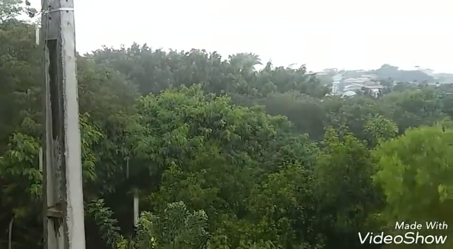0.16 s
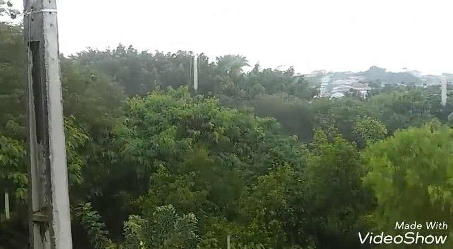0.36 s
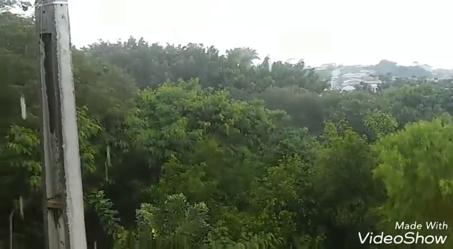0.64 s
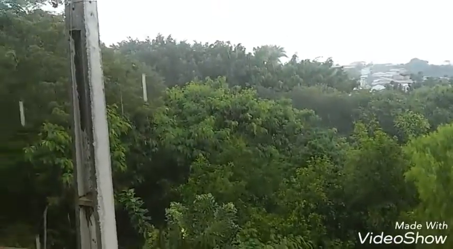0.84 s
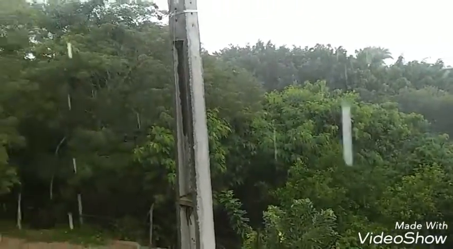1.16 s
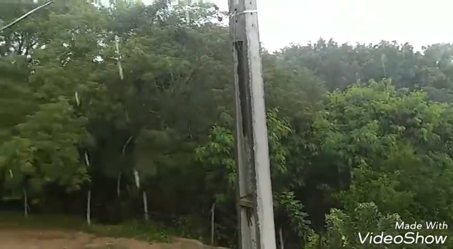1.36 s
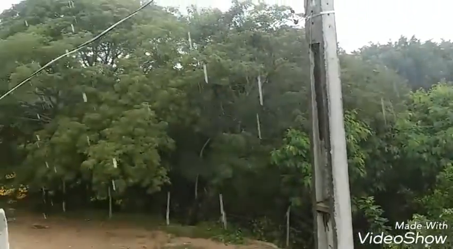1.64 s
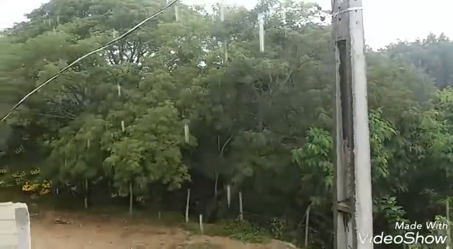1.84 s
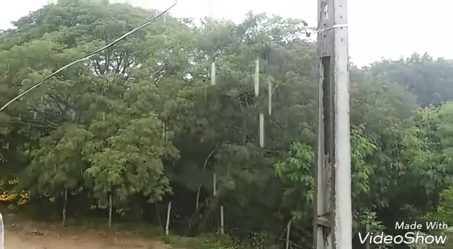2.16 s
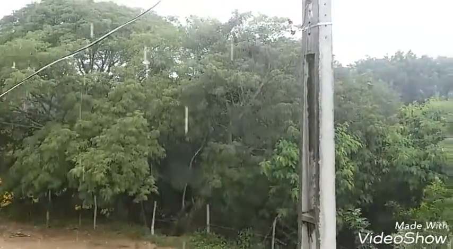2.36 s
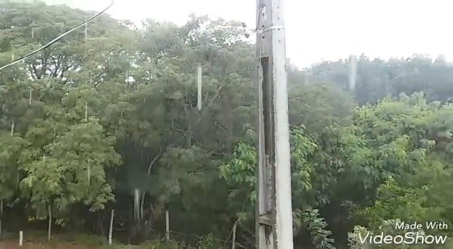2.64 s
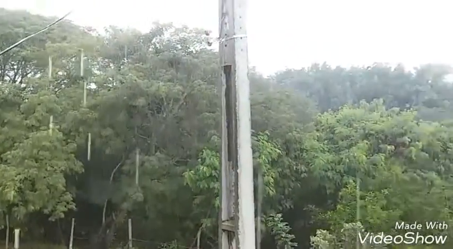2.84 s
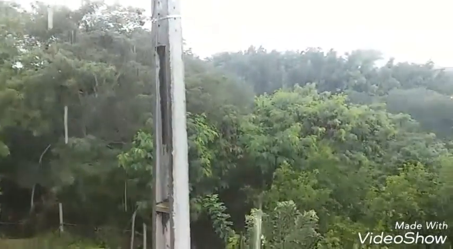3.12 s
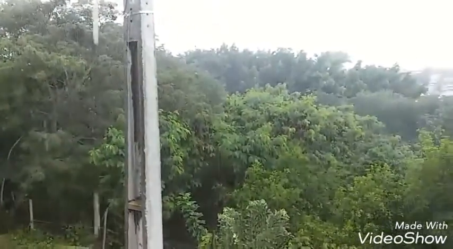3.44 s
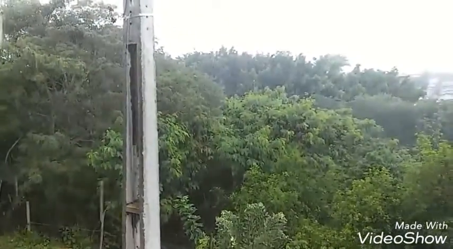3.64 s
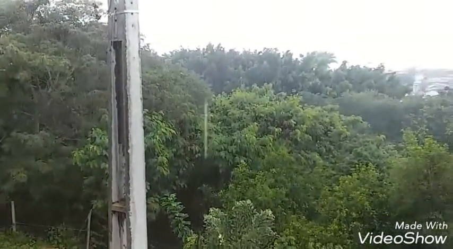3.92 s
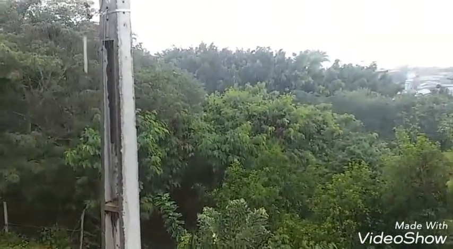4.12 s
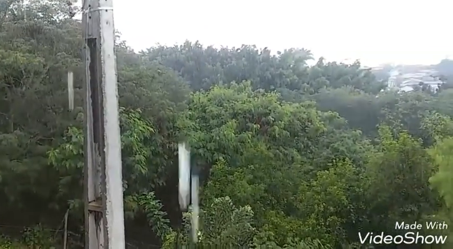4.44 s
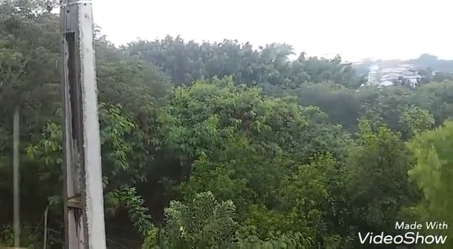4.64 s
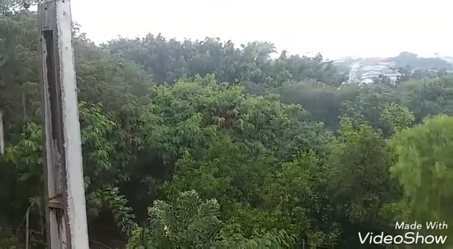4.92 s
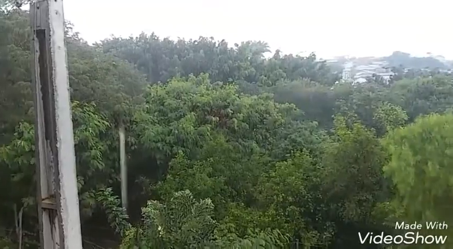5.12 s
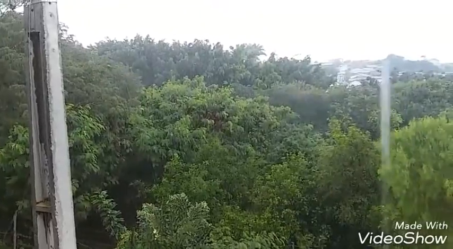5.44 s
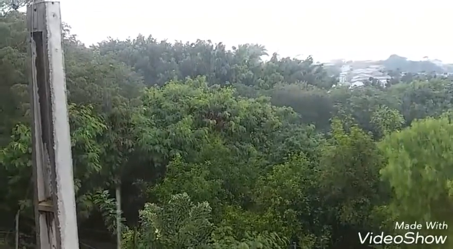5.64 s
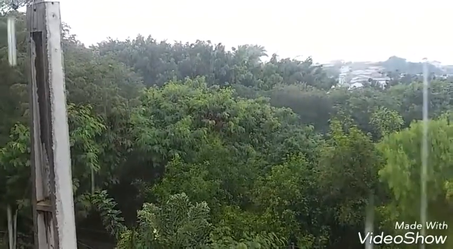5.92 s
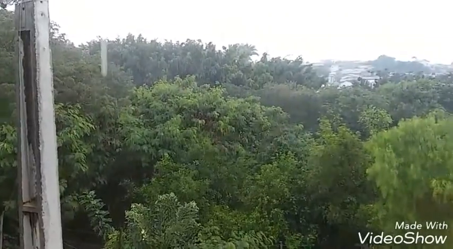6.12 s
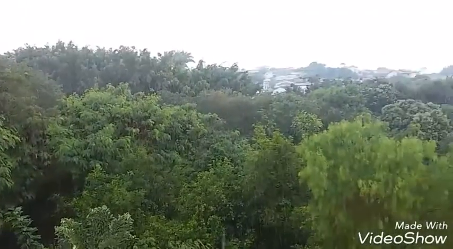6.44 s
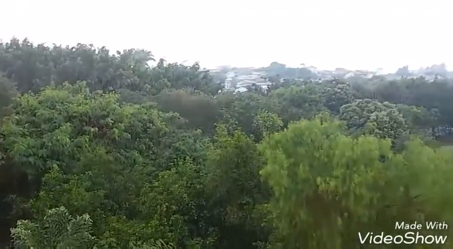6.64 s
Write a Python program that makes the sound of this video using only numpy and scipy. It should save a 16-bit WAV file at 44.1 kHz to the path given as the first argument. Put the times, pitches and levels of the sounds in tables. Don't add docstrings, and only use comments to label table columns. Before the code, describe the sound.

Heavy rain in a green, open place. Water running off a roof edge breaks on paving close to the microphone in bright, uneven bursts of spray, with crisp clicking drops, splashes and duller puddle plops. Fine rain hisses all round over a soft distant wash. The run-off is strongest in the first three seconds, then comes and goes and thins. Faint gusts rumble on the small mono microphone.

```python
import sys
import numpy as np
from scipy import signal
from scipy.fft import rfft, irfft, next_fast_len
from scipy.io import wavfile

SR = 44100
rng = np.random.default_rng(int(sys.argv[2]) if len(sys.argv) > 2 else 0)


def wav_out(sig):
    wavfile.write(sys.argv[1], SR, np.round(np.clip(np.atleast_2d(sig).T, -1, 1) * 32767).astype(np.int16))


def volts_from_decibels(level):
    exponent = np.asarray(level, float) / 20
    return 10 ** exponent


N = 298557

# start in seconds, spray level in dB,
# coarseness in dB (more patter, less mist), time to die away by 60 dB in seconds.
SURGES = [(.225, -19.5, -0.5, 1.6), (.85, -22, 0.5, 2.1), (1.029, -20.5, 3, 0.72),
          (1.276, -17.5, -5.5, 0.81), (1.461, -21, -4.5, 0.53), (1.68, -22.5, 4, 0.94),
          (1.819, -18, -2.5, 0.84), (2.1, -20.5, -0.5, 0.54), (2.39, -20, 3, 1.9), (2.55, -17.5, -5.5, 0.7),
          (2.771, -19, -4.5, 1.02), (3.03, -25, 12.5, 0.61), (3.385, -28, 8, 1.1), (3.57, -30, 6, 1.7),
          (3.885, -18, 1, 1.08), (4.129, -25.5, 0, 0.75), (4.35, -21.5, 8, 0.44), (4.459, -20.5, -3.5, 1),
          (4.722, -23, 5.5, 1.1), (5.02, -22.5, 0.5, 0.4), (5.19, -27, 6, 1.14), (5.43, -31.5, -5, 1.3),
          (5.785, -27, 2, .6), (5.845, -20, -4, .55), (6.005, -25, -3, .8), (6.249, -25.5, 5.5, 0.83),
          (6.35, -25, -11.5, 0.48), (6.505, -24, 0, .6), (6.665, -24.5, 1, 1.2), (6.745, -20, 0, .9)]
# time in seconds, steady spray level in dB.
FACING = [(0, -19), (.5, -20), (1.2, -23.5), (1.65, -24.5), (2.0, -21), (2.35, -21), (2.7, -21.5),
          (2.95, -22.5), (3.3, -31), (3.85, -28), (4.3, -31.5), (4.7, -24.5), (5.05, -26), (5.3, -30.5),
          (5.6, -27), (5.76, -31), (6.22, -33), (6.77, -28)]
# frequency in Hz, level in dB per Hz.
SPRAY_COLOUR = [(2940, -39), (5000, -11), (6280, -8), (8340, 1.5), (9340, 2.5), (13600, -9.5),
                (15500, -9.5)]
# frequency in Hz, level in dB per Hz.
PATTER_COLOUR = [(760, -16), (1300, -12.5), (1560, -6.5), (1930, -6.5), (2320, -3), (3510, -5), (3930, -4),
                 (6210, -9), (7000, -8.5), (9100, -35), (15400, -120)]
# start in seconds, peak in dB, centre in Hz.
SPLASHES = [(.2505, -21, 6340), (.637, -12, 5530), (.832, -14, 5900), (.9675, -11, 7000),
            (1.2965, -18.5, 6630), (1.3403, -6, 6840), (1.4587, -18, 4470), (1.733, -7.5, 4830),
            (1.818, -15, 5180), (1.8687, -12, 6380), (1.9709, -9, 6940), (2.0098, -13, 4800),
            (2.398, -15, 4100), (2.4144, -10, 5500), (2.58, -3, 5600), (2.686, -9.5, 6800),
            (3.4397, -19.5, 4430), (3.8886, -16, 5560), (3.914, -11.5, 5770), (3.9417, -6, 3980),
            (4.349, -13.5, 5800), (4.3642, -7, 4900), (4.4662, -11.5, 6700), (5.032, -20.5, 5020),
            (5.0556, -7, 5540), (5.1942, -4.5, 4290), (5.34, -14.5, 4460), (6.6633, -15, 6800)]
# start in seconds, peak in dB, centre in Hz,
# length of the fizz as a share of the usual.
PLOPS = [(.3472, -12.5, 3280, 0.86), (.8766, -16, 2840, 1.2), (1.0331, -12, 3400, 1.2),
         (1.663, -14.5, 2540, 1.2), (1.6786, -14, 2300, 1.1), (2.0098, -9, 3000, .6),
         (2.261, -19, 1720, 0.56), (2.4778, -11, 2970, 1.2), (2.804, -17.5, 2860, .8),
         (3.035, -12.5, 3100, 0.93), (3.09, -14, 3610, 1), (3.125, -13, 2700, 0.99), (3.44, -18, 2910, 1.3),
         (3.652, -8.5, 2550, 1), (3.7195, -15, 2580, 0.85), (3.99, -15.5, 3420, 0.69),
         (4.3642, -6, 2900, .7), (4.5552, -15, 1596, 1.9), (4.721, -12.5, 2890, 1.3),
         (4.786, -14, 2250, 1.6), (4.8467, -15, 2430, .8), (4.8883, -6.5, 2240, 1.04),
         (4.9047, -8, 2200, 1.6), (4.915, -12.5, 1560, 1.06), (5.1158, -14.5, 3030, 0.89),
         (5.448, -15, 2920, .6), (5.8521, -13, 2700, .6), (6.256, -16, 2700, 1.3), (6.5082, -19, 2570, 0.8)]
# start in seconds, peak in dB.
TICKS = [(.0724, -6), (0.2271, 0.5), (.5911, -10), (0.7998, -2), (.8566, 1), (1.0843, -3.5), (1.279, -1),
         (1.2962, -4.5), (1.821, -2), (1.853, -3), (2.389, -1.5), (2.559, -2.5), (2.6867, -1.5),
         (2.767, 2.5), (2.804, -0.5), (3.3882, -6.5), (3.623, -6.5), (3.9065, -17), (3.915, -7),
         (4.2827, -4), (4.3798, -7), (4.4665, -1), (4.7671, -8), (4.856, -2), (4.949, -4.5), (5.003, -0.5),
         (5.229, -6.5), (5.4327, -7.5), (5.854, -5), (6.6715, -5.5)]
# frequency in Hz, level in dB per Hz.
MIST_COLOUR = [(5000, -26.5), (8000, -10), (10500, -0.5), (13000, -0.5), (15000, -5), (15800, -16),
               (18000, -18)]
# frequency in Hz, level in dB per Hz.
WASH_COLOUR = [(88, -42), (150, -0.5), (264, -2.5), (574, 1.5), (952, 0), (1100, 0), (1230, -6.5),
               (2500, -9), (3250, -3), (5500, -120)]
# centre in seconds, peak in dB, half width in seconds.
GUSTS = [(.17, -36.5, 0.076), (.55, -38.5, 0.1), (1.22, -34, 0.067), (1.49, -25.5, 0.07), (1.7, -29.5, .12),
         (2.03, -34.5, 0.12), (2.55, -37, 0.16), (3.1, -32, 0.092), (3.3, -30.5, 0.13), (3.5, -32, 0.09),
         (3.66, -35, .07), (3.95, -38.5, 0.066), (4.18, -34.5, 0.039), (4.35, -38, 0.068),
         (4.92, -35.5, 0.083), (5.09, -31, 0.071), (5.599, -38.5, .08), (5.85, -38.5, 0.071),
         (6.24, -44, 0.033)]
# frequency in Hz, level in dB per Hz.
WIND_COLOUR = [(12, -40), (20, 4), (59, 1.5), (103, -2.5), (200, -17), (300, -18), (390, -33.5),
               (660, -120)]
# centre in seconds, lowest Hz, highest Hz, level in dB.
FLECKS = [
    (1.645, 11700, 13300, -39),
    (2.97, 7500, 9060, -31),
    (3.32, 5700, 6960, -45),
    (4.595, 8200, 10000, -25),
    (4.595, 10300, 11900, -33),
    (5.27, 9000, 10500, -35),
    (5.27, 13600, 15400, -40),
    (5.99, 5700, 7800, -39),
    (5.99, 13000, 15300, -38),
]
# frequency in Hz, step in dB.
ROUNDING_STEP = [(60, 0), (300, -0.5), (700, 1.5), (1300, -0.5), (2500, 2.5), (6000, 1), (9000, 2),
                 (13000, -2), (14600, 0.5), (15800, 2)]

SURGE_RISE_S, SURGE_HOLD_S = .025, .015
PATTER_DB, PATTER_FOLLOWS, PATTER_SURGE_DB = -31, .3, -10.5
MIST_DB, MIST_FOLLOWS, MIST_SURGE_DB = -33, .8, -11.5
PORT_HZ, PORT_SCATTER = 8910, 0.038
WASH_DB, WASH_FADE_DB_PER_S = -35.5, 0.24
BREEZE_DB, BREEZE_FADE_DB_PER_S = -42.5, 1


def rms_one(x):
    return x / np.sqrt(np.mean(x ** 2) + 1e-20)


def drift(rate):
    r = np.exp(-80 * np.pi * rate / SR)
    slow = signal.lfilter([1], [1, -2 * r, r * r], rng.standard_normal(N // 40 + 2002))[2000:]
    return np.interp(np.arange(N) / 40, np.arange(len(slow)), rms_one(slow))


def band(x, low_hz, high_hz):
    sos = signal.butter(2, [low_hz, min(high_hz, .45 * SR)], "band", fs=SR, output="sos")
    return signal.sosfilt(sos, x)


def drops(per_s, spread_db, clump_db):
    sizes = volts_from_decibels(spread_db * np.minimum(rng.exponential(1, N), 5)) * rng.choice([-1, 1], N)
    lands = rng.random(N) < per_s * volts_from_decibels(clump_db * drift(15)) / SR
    return rms_one(sizes * lands)


def sheet(colour, impacts, grain_db, patchy_db):
    hz, db = np.transpose(colour)
    octaves = np.log2(min(hz[-1], .45 * SR) / hz[0])
    edges = hz[0] * 2 ** np.arange(0, octaves, 1 / 4)
    white = rng.standard_normal((2, N))
    together = drift(24)
    out = volts_from_decibels(grain_db) * impacts
    for k, (low, high) in enumerate(zip(edges, edges[1:])):
        flicker = volts_from_decibels(patchy_db * (0.37 * together + drift(14) + .7 * drift(4)))
        out = out + band(flicker * white[k % 2], low, high)
    size = next_fast_len(N)
    line_hz = np.arange(size // 2 + 1) * SR / size
    gain = volts_from_decibels(np.interp(np.log(line_hz + 1), np.log(hz), db))
    return rms_one(irfft(rfft(out, size) * gain, size)[:N])


def surges(coarse_share):
    s, db, coarse_db, t60 = np.transpose(SURGES)[:, :, None]
    age = np.arange(0, N, 32) / SR - s
    rise = np.clip(age / SURGE_RISE_S, 0, 1)
    fall_db = 60 * np.maximum(age - SURGE_RISE_S - SURGE_HOLD_S, 0) / t60
    power = rise ** 2 * volts_from_decibels(db + coarse_share * coarse_db - fall_db) ** 2
    return np.repeat(power.sum(axis=0), 32)[:N]


def facing():
    s, db = np.transpose(FACING)
    return np.interp(np.arange(N) / SR, s, db)


def spray(facing_db):
    level = volts_from_decibels(-1.0) * np.sqrt(volts_from_decibels(facing_db) ** 2 + surges(0))
    return level * sheet(SPRAY_COLOUR, drops(4000.0, 3.6, 3.0), grain_db=1, patchy_db=1.1)


def patter(turn_db):
    steady = volts_from_decibels(PATTER_DB + PATTER_FOLLOWS * turn_db)
    level = np.sqrt(steady ** 2 + volts_from_decibels(PATTER_SURGE_DB) ** 2 * surges(0.92))
    return level * sheet(PATTER_COLOUR, drops(1500.0, 4.6, 4.7), grain_db=-7.0, patchy_db=1.9)


def splashes(blobs, crack_db, crack_t60, tail_db, tail_t60, ratio):
    out, length = np.zeros(N + SR), SR // 2
    t = np.arange(length) / SR
    crack = volts_from_decibels(-60 * t / crack_t60) + volts_from_decibels(14.0) * (t == 0)
    for s, peak_db, hz, *lasts in blobs:
        shape = crack + volts_from_decibels(tail_db - 60 * t / (tail_t60 * np.prod(lasts)))
        uneven = volts_from_decibels(5.0 * np.minimum(rng.exponential(1, length), 5))
        fizz = rng.standard_normal(length) * uneven
        edges = hz / ratio, hz * ratio
        fizz = rms_one(band(band(fizz, *edges), *edges))
        out[round(s * SR):][:length] += volts_from_decibels(peak_db + crack_db) * shape * fizz
    return out[:N]


def ticks(echo_db, echo_s, fizz_db, fizz_t60, spread):
    out, length = np.zeros(N + SR), SR // 4
    t = np.arange(length) / SR
    click = np.eye(1, length)[0]
    click = click + volts_from_decibels(echo_db) * np.roll(click, round(echo_s * SR))
    for s, peak_db in TICKS:
        hz = PORT_HZ * (1 + PORT_SCATTER * rng.standard_normal())
        edges = hz / spread, hz * spread * 1.25
        ring = band(band(click, *edges), *edges)
        ring = ring / np.abs(ring).max()
        fizz = rms_one(band(rng.standard_normal(length), hz / spread, hz * spread))
        fizz = volts_from_decibels(fizz_db - 60 * t / fizz_t60) * fizz
        out[round(s * SR):][:length] += volts_from_decibels(peak_db - 2.5) * (ring + fizz)
    return out[:N]


def mist(turn_db):
    steady = volts_from_decibels(MIST_DB + MIST_FOLLOWS * turn_db)
    level = np.sqrt(steady ** 2 + volts_from_decibels(MIST_SURGE_DB) ** 2 * surges(-0.65))
    return level * sheet(MIST_COLOUR, drops(3000.0, 4.5, 3.3), grain_db=-1.0, patchy_db=1.9)


def wash():
    level = volts_from_decibels(WASH_DB - WASH_FADE_DB_PER_S * np.arange(N) / SR)
    return level * sheet(WASH_COLOUR, drops(900.0, 3.1, 1.0), grain_db=-14.5, patchy_db=2.06)


def wind():
    t = np.arange(N) / SR
    power = volts_from_decibels(BREEZE_DB - BREEZE_FADE_DB_PER_S * t) ** 2
    for s, db, half in GUSTS:
        power = power + volts_from_decibels(db) ** 2 * np.exp(-((t - s) / half) ** 2)
    return np.sqrt(power) * sheet(WIND_COLOUR, np.zeros(N), grain_db=-40, patchy_db=1.87)


def flecks():
    out, window = np.zeros(N), np.hanning(2048)
    hz = np.arange(1025) * SR / 2048
    for s, low_hz, high_hz, level_db in FLECKS:
        noise = irfft(rfft(rng.standard_normal(2048)) * (hz > low_hz) * (hz < high_hz))
        out[round(s * SR) - 1024:][:2048] += volts_from_decibels(level_db) * window * rms_one(noise)
    return out


def coarse_rounding(x, wobble_db, hop=1024, offset=992, count=740):
    n, k = np.arange(2 * hop), np.arange(count)
    window = np.sin(np.pi * (n[:, None] + .5) / (2 * hop))
    waves = np.cos(np.pi / hop * np.outer(n + .5 + hop / 2, k + .5))
    basis = window * waves * np.sqrt(2 / hop)
    starts = np.arange(offset % hop, N - 2 * hop, hop)
    frames = x[starts[:, None] + n]
    hz, db = np.transpose(ROUNDING_STEP)
    step_db = np.interp(np.log((k + .5) * SR / 2 / hop), np.log(hz), db)
    wobble = np.repeat(rng.standard_normal((len(starts), count // 4)), 4, axis=1)
    step = frames.std(axis=1, keepdims=True) * volts_from_decibels(step_db + wobble_db * wobble)
    tones = frames @ basis
    error = (step * np.round(tones / step) - tones) @ basis.T
    out = x.copy()
    out[starts[0]:][:hop * len(starts)] += error[:, :hop].ravel()
    out[starts[0] + hop:][:hop * len(starts)] += error[:, hop:].ravel()
    return out


def scene():
    facing_db = facing()
    turn_db = facing_db - facing_db.mean()
    close = splashes(SPLASHES, crack_db=-7.5, crack_t60=0.017, tail_db=-10.5, tail_t60=.35, ratio=1.25)
    close += splashes(PLOPS, crack_db=-6.5, crack_t60=0.017, tail_db=-9.5, tail_t60=.4, ratio=1.27)
    close += ticks(echo_db=-3, echo_s=0.0015, fizz_db=-20.5, fizz_t60=0.23, spread=1.3)
    mono = spray(facing_db) + patter(turn_db) + close + mist(turn_db) + wash() + wind()
    return np.stack([mono, mono])


def low_pass(x):
    return signal.sosfilt(signal.butter(12, 15870, fs=SR, output="sos"), x)


def record(dry):
    top = signal.cheby2(14, 60, 16500, fs=SR, output="sos")
    port = signal.butter(1, 35.0, "high", fs=SR, output="sos")
    rounded = .85 * np.tanh(dry[0] / 0.85)
    mono = signal.sosfilt(np.vstack([top, port]), rounded)
    mix = coarse_rounding(mono, wobble_db=3.5) + flecks() * [[1], [-1]]
    return low_pass(mix)


dry = scene()
out = record(dry)
wav_out(out)
```